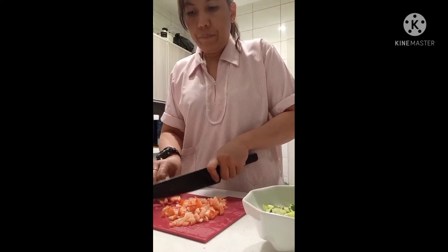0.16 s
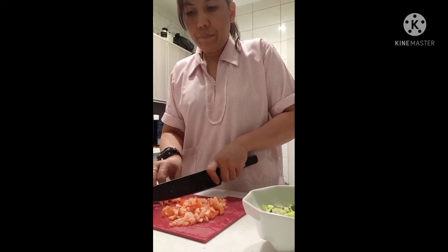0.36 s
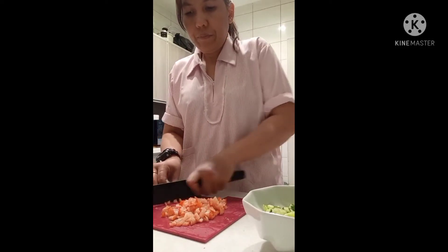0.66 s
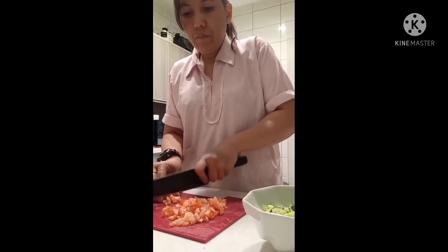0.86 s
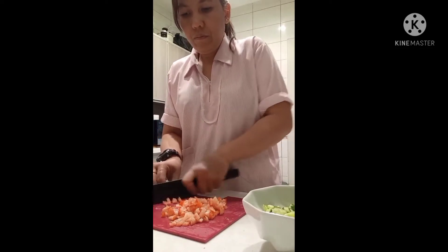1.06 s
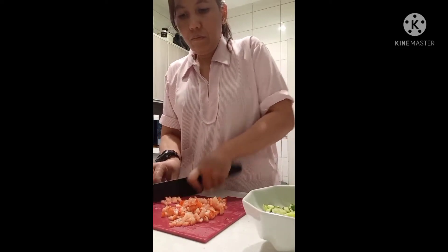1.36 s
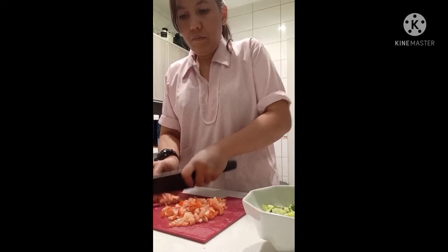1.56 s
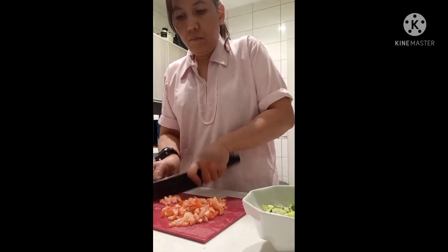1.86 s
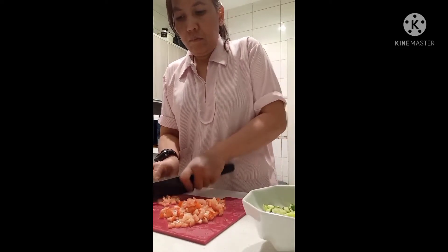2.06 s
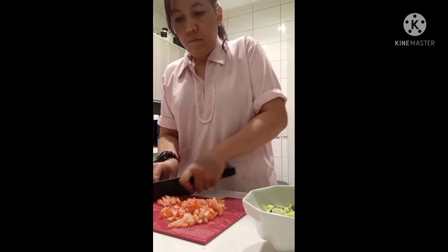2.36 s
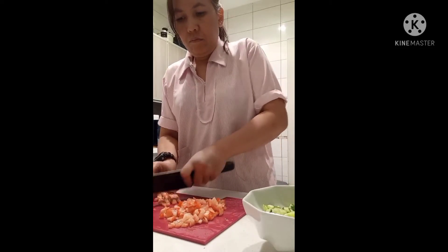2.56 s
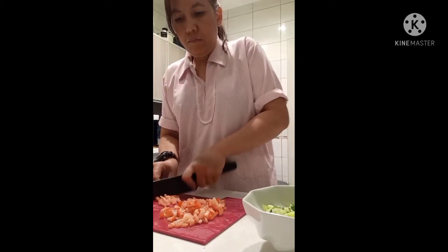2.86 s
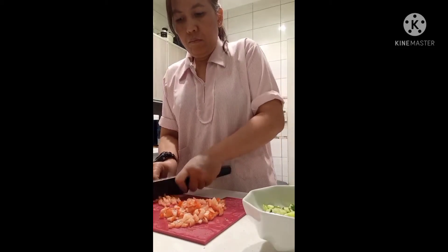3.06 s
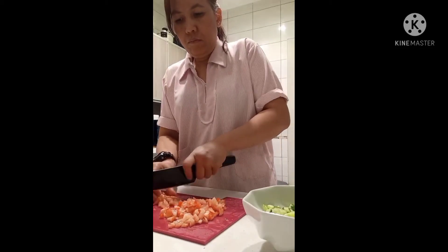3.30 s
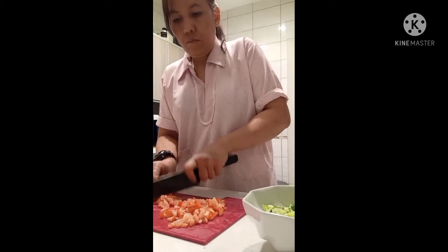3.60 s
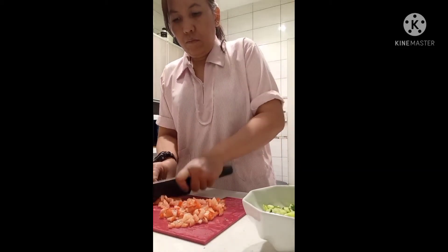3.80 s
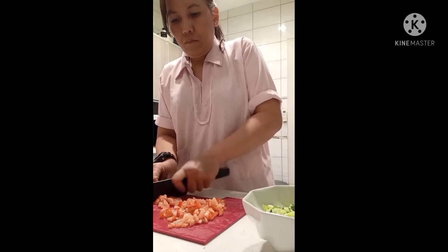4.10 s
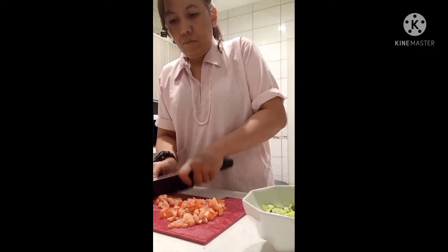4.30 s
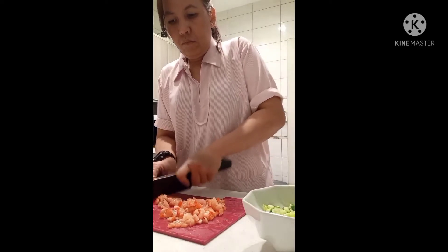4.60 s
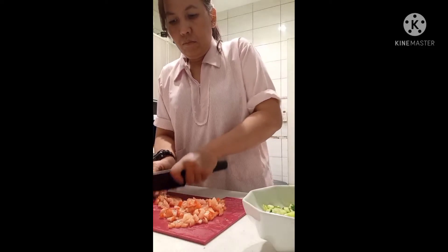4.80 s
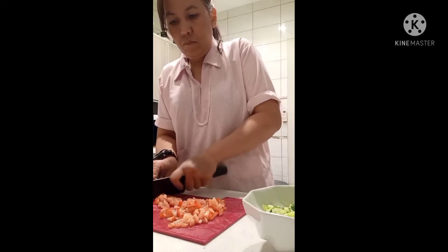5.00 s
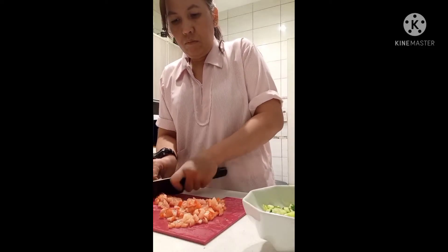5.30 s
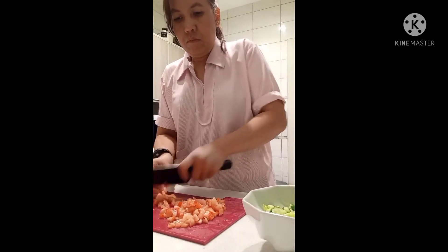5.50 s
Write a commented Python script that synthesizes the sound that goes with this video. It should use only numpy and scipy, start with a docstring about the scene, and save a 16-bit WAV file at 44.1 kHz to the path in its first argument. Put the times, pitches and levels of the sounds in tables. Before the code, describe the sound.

Twelve juicy knife cuts through tomato knock on a plastic cutting board, quickening slightly, while a kitchen appliance hums and blows.

```python
"""An appliance hums and blows in a tiled kitchen; from half a second in, a large knife dices tomato.
The appliance is motor tones over a rush of air. In each of twelve strokes the blade tears the skin
and hisses through wet flesh: bursting cells, friction and spurts of juice that ring the steel.
It then knocks on a plastic board, whose modes ring while the worktop thuds under it.
The tiles reflect the knocks and the cutting. The sound is almost mono."""
import sys
import numpy as np
from scipy import signal
from scipy.fft import rfft, irfft, next_fast_len
from scipy.io import wavfile
from scipy.ndimage import uniform_filter1d, minimum_filter1d

SR = 44100
rng = np.random.default_rng(int(sys.argv[2]) if len(sys.argv) > 2 else 0)


def waveform_to_disk(signal):
    """Save audio, clipped to [-1, 1], as 16-bit WAV at the path in sys.argv[1]."""
    frames = np.transpose(np.atleast_2d(signal))
    scaled = np.clip(frames, -1, 1) * 32767
    samples = np.round(scaled).astype(np.int16)
    wavfile.write(sys.argv[1], SR, samples)


N = 249165
TIME_S = np.arange(N) / SR

# Airflow spectrum, lower part and top. Each row: frequency in Hz, relative level in dB.
AIR_SPECTRUM = [(25, -25.5), (42, -9), (62, -0.5), (100, 6), (160, 0), (220, -3), (300, -2.5), (430, -2),
                (620, -8.5), (950, -10.5), (1500, -17.5), (2300, -31), (3200, -36), (4400, -44.5)]
AIR_TOP_SPECTRUM = [(5600, -36), (6300, -29), (7500, -42), (15500, -52.5)]
# Airflow over time. Each row: time in seconds, midrange level in dB.
AIR_LEVELS = [(0.0, -38.5), (0.47, -39), (1.35, -42), (2.31, -39), (3.43, -42), (4.55, -40), (5.65, -42.5)]
# Appliance tones. Each row: frequency in Hz, rms level in dB.
HUM_TONES = [(120, -38), (296, -55.5), (438, -53.5)]
# One cut per knock. Each row: time the skin gives way in seconds, spurt pitch in Hz, skin level in dB,
# press level in dB, press rise in dB/s, drag level in dB, drag hold in seconds, rasp over hiss in dB.
CUTS = [(0.489, 6340, -59, -37.5, 407, -49, 0.086, 2.5), (0.895, 5800, -53.5, -39, 386, -53, 0.077, 2.5),
        (1.286, 6270, -55, -43.5, 304, -57, .09, 1.5), (1.838, 5700, -46, -42, 500, -48, 0.092, 0),
        (2.235, 6000, -60, -42.5, 306, -62, 0.19, 5.5), (2.81, 2860, -43.5, -39.5, 350, -56.5, 0.094, 1),
        (3.599, 3450, -42.5, -42.5, 800, -56.5, 0.1, 4), (3.964, 6160, -38.5, -38.5, 800, -57, 0.089, 1.5),
        (4.287, 2840, -40.5, -33.5, 900, -58, 0.065, 0.5), (4.592, 3100, -37.5, -36, 800, -58.5, .06, 2),
        (4.886, 4560, -34, -39, 202, -55, 0.035, -4), (5.218, 6000, -59, -42.5, 85, -54, .04, 0)]
# Spectra of the cut flesh. Each row: frequency in Hz, relative level in dB.
HISS_SPECTRUM = [(5000, -8.5), (7500, 6), (10000, 0.5), (12500, 5.5), (15500, -5)]
RASP_SPECTRUM = [(600, 14), (1450, -7.5), (2200, 9), (3000, -5), (4000, 0.5), (6000, 9.5), (7500, -11),
                 (11000, -29)]
# Steel blade, damped by hand and tomato. Each row: frequency in Hz, width in Hz, gain in dB.
BLADE_MODES = [(1322, 234, 7.5), (2876, 32, -7), (3123, 48, -0.5), (3490, 220, -8), (4520, 130, -15),
               (4770, 210, -13.5), (5963, 176, 5), (6390, 310, 6), (9730, 350, -2), (11240, 260, -7),
               (13100, 450, -6.5)]
# Wet pieces squashed or shifting beside the blade. Each row: start in seconds, level in dB, pitch in Hz.
SQUISHES = [(1.03, -50.5, 6200), (1.35, -43, 2540), (1.915, -42.5, 6130), (1.9974, -56, 6300),
            (2.4686, -47, 5640), (2.8964, -49, 2890), (3.651, -43.5, 2600), (3.7394, -58, 2630),
            (3.999, -42.5, 4670), (4.0644, -56, 4540), (4.2937, -39.5, 6100), (4.3914, -52, 5550),
            (4.9344, -44.5, 5530)]
# Blade meets board. Each row: start in seconds, board level in dB, board tilt in dB/octave, slap level
# in dB, thud level in dB, clack level in dB, clack tilt in dB/octave, crack level in dB.
KNOCKS = [(0.5351, -22.5, 4.5, -12.5, -21.5, -27.5, 15, -29), (0.96, -21, 1, -22.5, -26, -30, 5.5, -45),
          (1.3379, -22, -2.5, -27.5, -26, -34, 1, -49), (1.8751, -26, -1.5, -36.5, -28, -48, 17, -58),
          (2.31, -16.5, 2.5, -20.5, -24, -27, -3.5, -44.5), (2.872, -15.5, 5, -28.5, -30.5, -22, -4, -40.5),
          (3.6367, -18.5, 2, -25, -25.5, -30, 2, -40.5), (3.9918, -25, -0.5, -32, -28.5, -45, 3, -51),
          (4.3326, -21.5, 1.5, -25.5, -27, -35.5, -15, -59), (4.632, -16.5, 5.5, -23, -25, -23.5, -14, -47),
          (4.9158, -17, 6.5, -35, -29.5, -21, -7.5, -41.5),
          (5.2614, -18.5, 5.5, -41, -30, -19.5, -4, -38.5)]
# Edge cracking on plastic. Each row: frequency in Hz, gain in dB.
CRACK_SPECTRUM = [(1200, 2), (2400, 2.5), (3400, 6), (5000, 0.5), (7000, 5), (15000, -9)]
# Struck modes. Each row: frequency in Hz, relative level in dB, t60 in seconds.
CLACK_MODES = [(1038, -6, 0.027), (1103, 4.5, 0.015), (1185, -4, 0.028), (1261, -8.5, 0.047),
               (1395, -0.5, 0.022), (1579, -18.5, 0.1), (1705, -10, 0.03), (1900, -8.5, 0.032),
               (1740, -31, .04), (2178, -18, 0.042), (2480, -23, 0.035), (2780, -52, .04)]   # blade on board
BOARD_MODES = [(235.5, -7.5, 0.25), (291.5, -7, 0.21), (363.5, -4, 0.085), (411.3, -0.5, 0.085),
               (432.4, -1, 0.052), (507.2, 1, 0.076), (569.6, 11, 0.014), (633.6, -6, 0.053),
               (697, -4.5, 0.037), (831.5, -2.5, 0.043)]   # board bending
SLAP_MODES = [(255, -9, 0.072), (349.6, 5.5, 0.027), (391.4, -2, 0.025)]   # flat of the blade slapping the board
WORKTOP_MODES = [(66, -46, 0.091), (84.4, 1, 0.068), (95.4, 15, 0.065), (131, -3.5, 0.16)]
# First reflections off worktop and wall. Each row: delay in seconds, gain in dB.
ECHOES = [(.0035, -20.5), (.0056, -12), (0.016, -14), (0.028, -32)]
# Kitchen reverberation. Each row: frequency in Hz, t60 in seconds, relative level in dB.
REVERB_BANDS = [(100, 0.27, 0.5), (346, 0.22, 3.5), (1240, 0.28, -3), (2980, 0.59, -6), (6750, 0.11, 0.5),
                (15500, 0.22, 3)]
# Faint left-right difference, mostly in the bass; mono above about 1 kHz.
# Each row: frequency in Hz, gain in dB.
STEREO_WIDTH_SPECTRUM = [(25, -3), (70, -33), (500, -29), (1200, -46), (3000, -80), (12000, -45)]
# Microphone port response, with a deep dip. Each row: frequency in Hz, gain in dB.
MIC_RESPONSE = [(20, -5), (40, -11.5), (65, -1), (5200, 1), (6400, -8), (6800, -9.5), (7250, -22),
                (8200, -19.5), (9200, -13.5), (12000, -10.5), (15500, -5)]


def from_db(db):
    return 10 ** (np.asarray(db) / 20)


def unit_rms(x):
    return x / np.sqrt(np.mean(x ** 2) + 1e-20)


def at_hz(table, hz, column=1):
    """Table column, interpolated over log frequency."""
    table = np.array(table)
    return np.interp(np.log(np.maximum(hz, 1)), np.log(table[:, 0]), table[:, column])


def colour(x, spectrum):
    """Minimum-phase filter with the given spectrum."""
    size = 2 * next_fast_len(len(x) // 2 + 2048, True)
    gain = from_db(at_hz(spectrum, np.fft.rfftfreq(size, 1 / SR)))
    cepstrum = irfft(np.log(gain))
    cepstrum[1:size // 2] *= 2
    cepstrum[size // 2 + 1:] = 0
    return irfft(rfft(x, size) * np.exp(rfft(cepstrum)))[:len(x)]


def drift(rate_hz):
    """Straight lines between unit Gaussian draws."""
    return np.interp(TIME_S * rate_hz, np.arange(4096), rng.standard_normal(4096))


def resonance(x, hz, width_hz):
    """Band-pass, unit peak gain."""
    r = np.exp(-np.pi * width_hz / SR)
    poles = [1, -2 * r * np.cos(2 * np.pi * hz / SR), r * r]
    return signal.lfilter(np.array([1, 0, -1]) * (1 - r * r) / 2, poles, x)


def add(track, start_s, sound):
    i = max(round(start_s * SR), 0)
    track[i:i + len(sound)] += sound[:N - i]


def at_level(sound, db):
    """Scale by the rms of the first 40 ms."""
    return sound * from_db(db) / np.sqrt(np.mean(sound[:SR // 25] ** 2) + 1e-20)


def swell(t, rise_db_per_s=0, hold_s=0, fall_db_per_s=0):
    """Envelope: rises to 1 at t = 0, holds, falls."""
    return from_db(rise_db_per_s * np.minimum(t, 0) - fall_db_per_s * np.maximum(t - hold_s, 0))


def appliance(air_over_midrange_db=2.5):
    """A motor hums at twice the mains rate, with two fainter tones, and moves air."""
    air = unit_rms(colour(rng.standard_normal(N), AIR_SPECTRUM + AIR_TOP_SPECTRUM))
    midrange_db = np.interp(TIME_S, *np.transpose(AIR_LEVELS))
    air *= from_db(midrange_db + air_over_midrange_db + 0.88 * drift(10))
    hum = 0
    for hz, db in HUM_TONES:
        amplitude = np.sqrt(2) * from_db(db + 3.5 * drift(7))
        hum += amplitude * np.sin(2 * np.pi * hz * TIME_S + 0.88 * drift(12))
    return air + hum


def wet_grains(rate_hz, friction_gain):
    """Cells burst at random over smooth friction noise."""
    sizes = from_db(4 * np.minimum(rng.exponential(1, N), 4)) * rng.choice([-1, 1], N)
    bursts = unit_rms(sizes * (rng.random(N) < rate_hz / SR))
    return unit_rms(bursts + friction_gain * rng.standard_normal(N))


def blade(x):
    """Friction rings the blade; each cut favours other modes."""
    spots_db = rng.normal(0, 3, len(BLADE_MODES))
    return sum(from_db(db + spot_db) * resonance(x, hz, width_hz)
               for (hz, width_hz, db), spot_db in zip(BLADE_MODES, spots_db))


def slicing():
    """The blade tears skin, presses flesh and drags in pulp; it rings, and the push reaches the board."""
    out = np.zeros(N)
    hiss = unit_rms(colour(wet_grains(rate_hz=2000, friction_gain=0.55), HISS_SPECTRUM))
    rasp = unit_rms(colour(wet_grains(rate_hz=870, friction_gain=0.86), RASP_SPECTRUM))
    push = unit_rms(resonance(rng.standard_normal(N), hz=334, width_hz=100))
    friction = wet_grains(rate_hz=1200, friction_gain=0.3)
    for (knock_s, *_), cut in zip(KNOCKS, CUTS):
        skin_s, _, skin_db, press_db, rise_db_per_s, drag_db, drag_s, rasp_db = cut
        span = (TIME_S > skin_s - 0.05) & (TIME_S < knock_s + 0.4)
        since_skin_s, since_knock_s = TIME_S[span] - skin_s, TIME_S[span] - knock_s
        stretch = swell(since_skin_s, rise_db_per_s=1699)
        tear = from_db(skin_db) * swell(since_skin_s, fall_db_per_s=604)
        # After landing, the flesh relaxes; the blade draws on, then lifts clear.
        press = from_db(press_db) * swell(since_knock_s, rise_db_per_s, fall_db_per_s=413.5)
        drag = from_db(drag_db) * swell(since_knock_s, rise_db_per_s, drag_s, fall_db_per_s=175)
        effort = stretch * np.sqrt(tear ** 2 + press ** 2 + drag ** 2)
        ring = unit_rms(blade(friction[span]))
        rubbing = ring + from_db(-7) * rasp[span] + from_db(4.5) * push[span]
        out[span] += effort * (hiss[span] + from_db(rasp_db) * rubbing)
    return out * from_db(1.8 * drift(140))


def spurts(rise_s=0.0045, fall_s=0.0073, lead_s=0.0088, over_skin_db=-8, spray_db=-17, ring_db=-5):
    """Pierced skin and squashed pieces give short, pitched spurts of juice that shake the blade."""
    out, t = np.zeros(N), TIME_S[:SR // 10]
    grains = wet_grains(rate_hz=2900, friction_gain=0.75)
    envelope = (1 - np.exp(-t / rise_s)) * np.exp(-t / fall_s)
    pierced = [(skin_s - lead_s, skin_db + over_skin_db, hz) for skin_s, hz, skin_db, *_ in CUTS]
    for start_s, db, hz in pierced + SQUISHES:
        spurt = grains[round(start_s * SR):][:len(t)] * envelope
        pitched = resonance(spurt, hz, width_hz=300)
        sound = pitched + from_db(spray_db) * spurt + from_db(ring_db) * blade(spurt)
        add(out, start_s, at_level(sound, db))
    return out


def struck(modes, rise_s, tilt_db_per_oct=0):
    """Decaying modes; level and pitch shift a little with the spot hit."""
    t = TIME_S[:SR // 3]
    hz, db, t60_s = np.array(modes).T[:, :, None]
    spot_db, detune = rng.normal(0, 1.6, hz.shape), rng.normal(1, 0.007, hz.shape)
    gain = from_db(db + tilt_db_per_oct * np.log2(hz / hz[0]) + spot_db)
    waves = gain * np.exp(-np.log(1000) * t / t60_s) * np.sin(2 * np.pi * hz * detune * t)
    return waves.sum(axis=0) * (1 - np.exp(-t / rise_s))


def bending(x):
    """Low bending waves travel slowly: two allpasses delay the bass a few milliseconds."""
    for hz, width_hz in [(230, 330), (480, 520)]:
        r = np.exp(-np.pi * width_hz / SR)
        poles = [1, -2 * r * np.cos(2 * np.pi * hz / SR), r * r]
        x = signal.lfilter(poles[::-1], poles, x)
    return x


def knocks(crack_fall_s=0.0056):
    """The edge cracks on the plastic, blade and board clack, then board and worktop give way."""
    board, clack, thud, crack = np.zeros((4, N))
    t = TIME_S[:SR // 8]
    for start_s, board_db, board_tilt, slap_db, thud_db, clack_db, clack_tilt, crack_db in KNOCKS:
        for track, modes, rise_s, tilt_db_per_oct, db in [
                (board, BOARD_MODES, 0.0011, board_tilt, board_db),
                (board, SLAP_MODES, 0.0017, 0, slap_db),
                (clack, CLACK_MODES, 0.0031, clack_tilt, clack_db),
                (thud, WORKTOP_MODES, 0.021, 0, thud_db)]:
            add(track, start_s, at_level(struck(modes, rise_s, tilt_db_per_oct), db))
        burst = rng.standard_normal(len(t)) * np.exp(-t / crack_fall_s)
        add(crack, start_s, at_level(burst, crack_db))
    sharp = clack + colour(crack, CRACK_SPECTRUM)
    echoes = sum(from_db(db) * np.interp(TIME_S - delay_s, TIME_S, sharp, left=0)
                 for delay_s, db in ECHOES)
    low_cut = signal.butter(4, 56, "high", fs=SR, output="sos")   # small plates radiate no deep bass
    return signal.sosfilt(low_cut, bending(board) + thud + sharp + echoes)


def kitchen(x, build_s=0.007):
    """Dense reflections off the tiles, dying band by band."""
    t, edges_hz = TIME_S[:SR // 2], np.geomspace(50, 18000, 10)
    response = np.zeros(len(t))
    for low_hz, high_hz in zip(edges_hz, edges_hz[1:]):
        hz = np.sqrt(low_hz * high_hz)
        t60_s, db = at_hz(REVERB_BANDS, hz), at_hz(REVERB_BANDS, hz, column=2)
        band_pass = signal.butter(2, [low_hz, high_hz], "band", fs=SR, output="sos")
        band = signal.sosfilt(band_pass, rng.standard_normal(len(t)))
        response += band * from_db(db) * np.exp(-np.log(1000) * t / t60_s)
    response *= 1 - np.exp(-(t / build_s) ** 2)
    return signal.fftconvolve(x, response / np.sqrt(np.sum(response ** 2)))[:N]


def scene():
    """Knife and appliance in the kitchen; left and right are almost the same."""
    blows, juice, background = knocks(), slicing() + spurts(), appliance()
    reverb = kitchen(from_db(-11) * blows + from_db(-14.5) * juice)
    mid = blows + juice + reverb + background
    side = colour(kitchen(blows + background), STEREO_WIDTH_SPECTRUM)
    return np.array([from_db(0.69) * mid + side, from_db(0.95) * mid - side])


def record(dry, ceiling=0.97, fade_s=0.004, cutoff_hz=15650):
    """Microphone colour, fast look-ahead limiter, end fades, steep top cut."""
    heard = np.array([colour(channel, MIC_RESPONSE) for channel in dry])
    allowed_gain = ceiling / np.maximum(np.abs(heard).max(axis=0), ceiling)
    held_gain = minimum_filter1d(allowed_gain, size=65)
    gain = uniform_filter1d(uniform_filter1d(held_gain, size=33), size=33)
    fades = np.minimum(np.minimum(TIME_S, TIME_S[::-1]) / fade_s, 1)
    top_cut = signal.ellip(12, 0.1, 80, cutoff_hz, fs=SR, output="sos")
    return signal.sosfilt(top_cut, heard * gain * fades)


dry = scene()
out = record(dry)
waveform_to_disk(out)
```